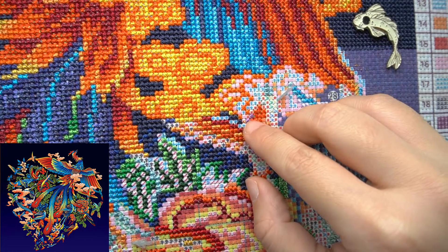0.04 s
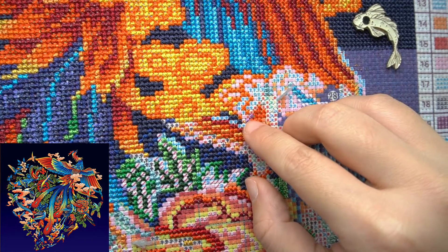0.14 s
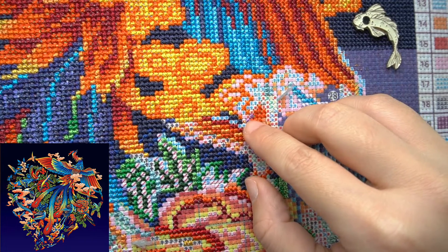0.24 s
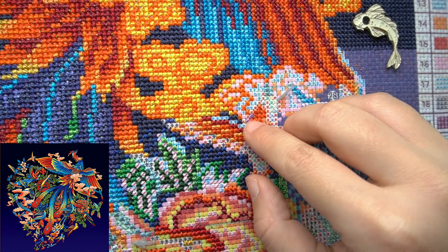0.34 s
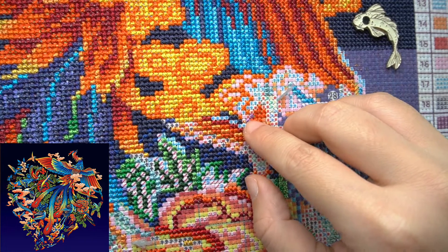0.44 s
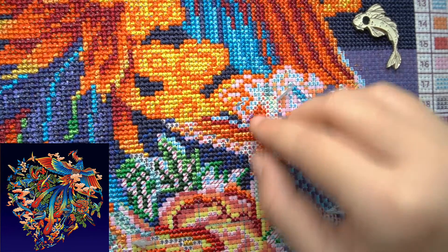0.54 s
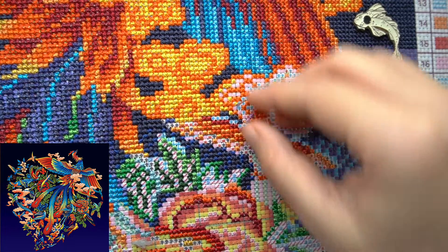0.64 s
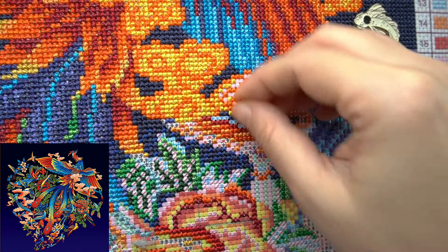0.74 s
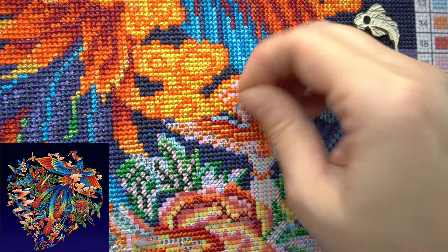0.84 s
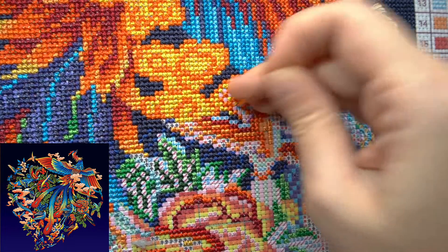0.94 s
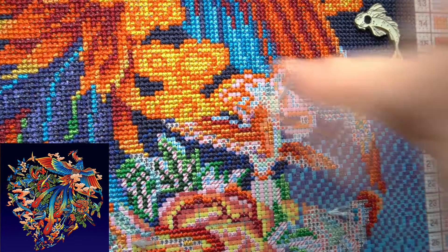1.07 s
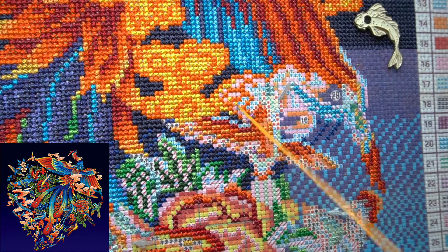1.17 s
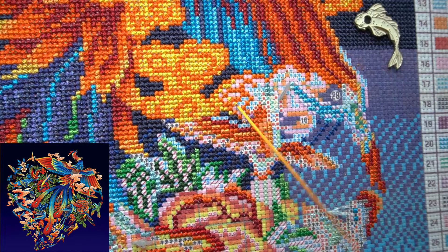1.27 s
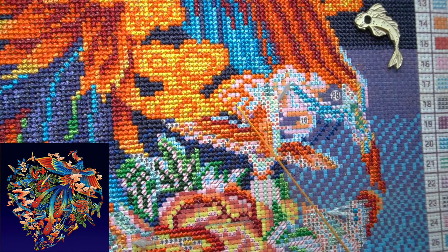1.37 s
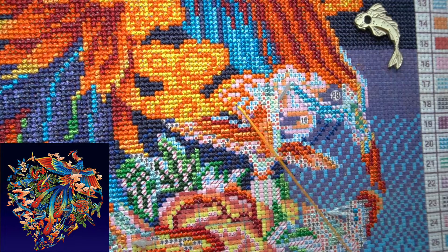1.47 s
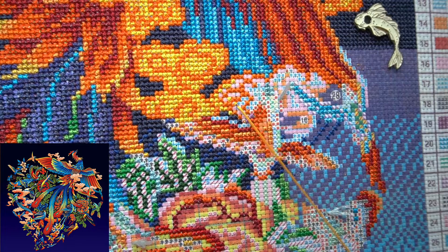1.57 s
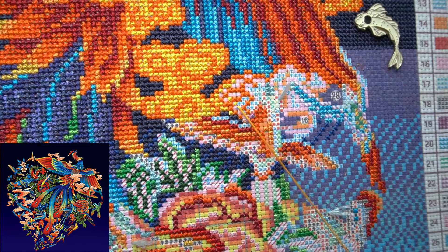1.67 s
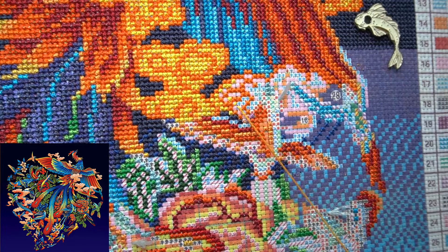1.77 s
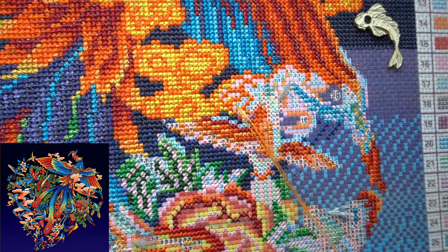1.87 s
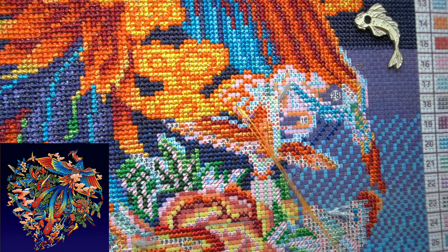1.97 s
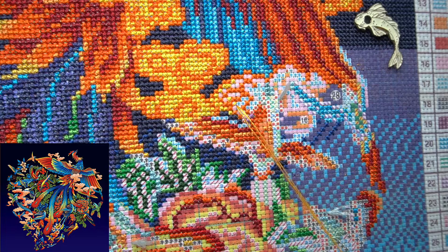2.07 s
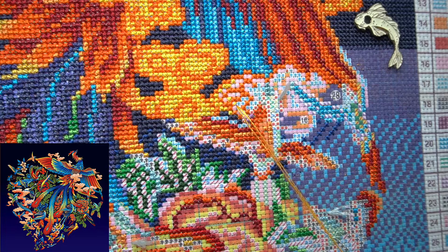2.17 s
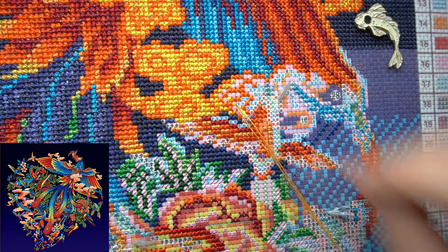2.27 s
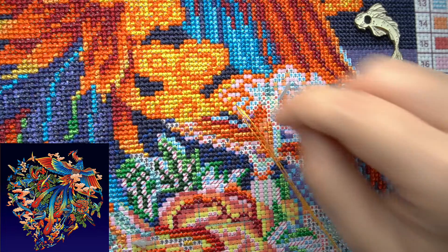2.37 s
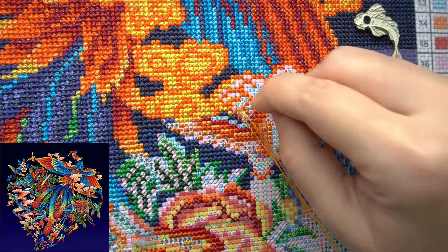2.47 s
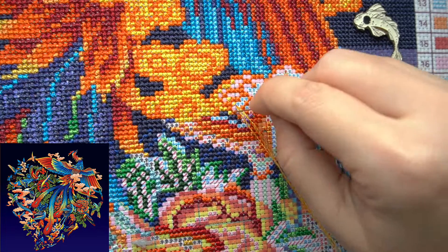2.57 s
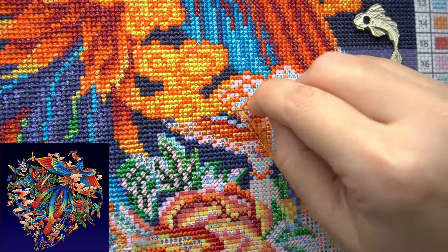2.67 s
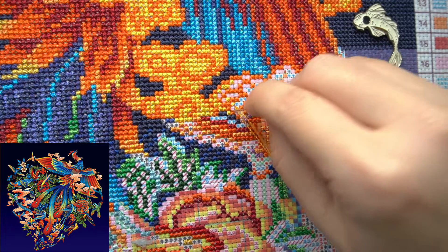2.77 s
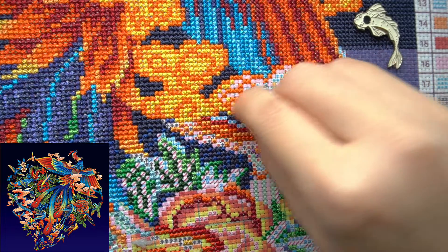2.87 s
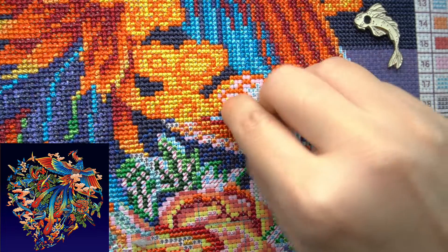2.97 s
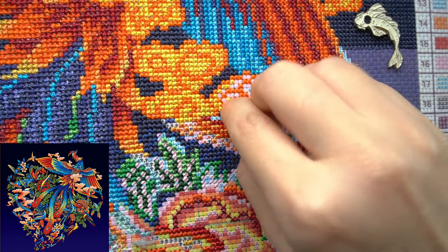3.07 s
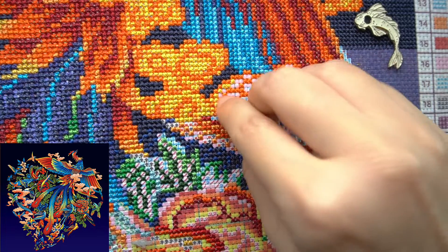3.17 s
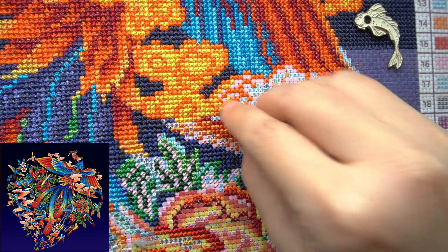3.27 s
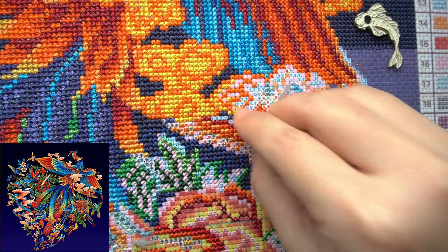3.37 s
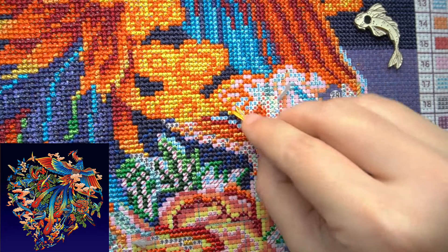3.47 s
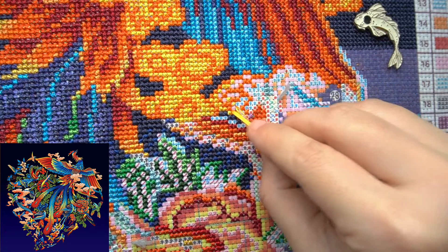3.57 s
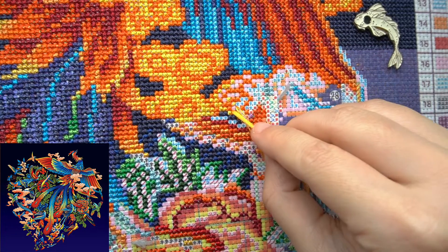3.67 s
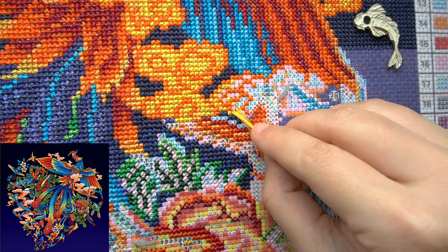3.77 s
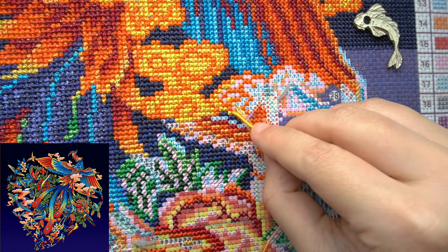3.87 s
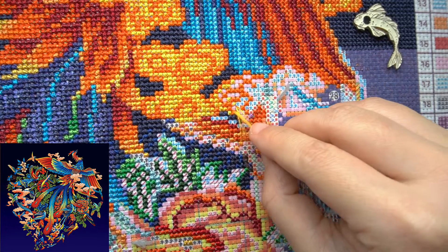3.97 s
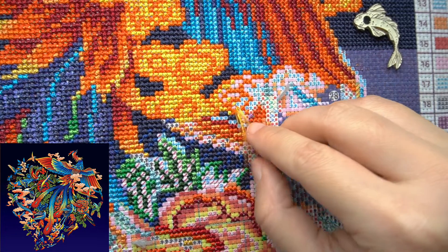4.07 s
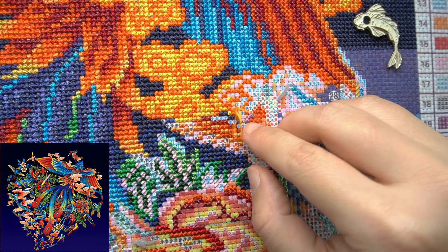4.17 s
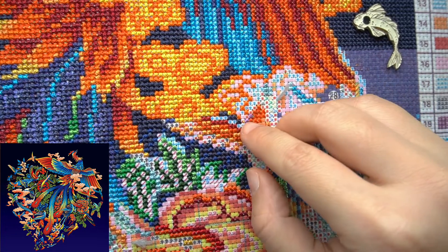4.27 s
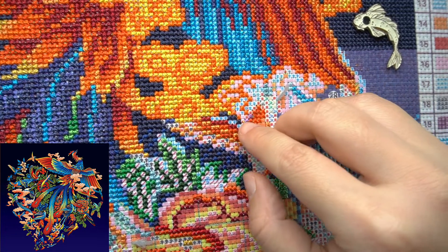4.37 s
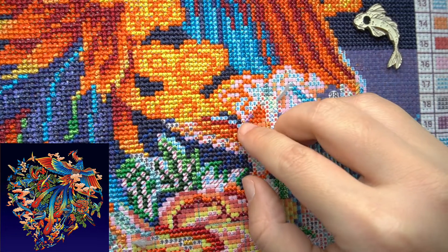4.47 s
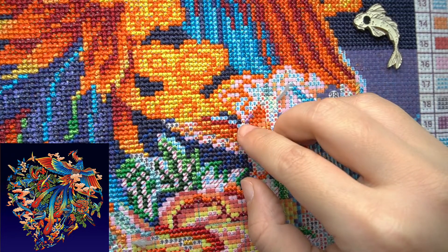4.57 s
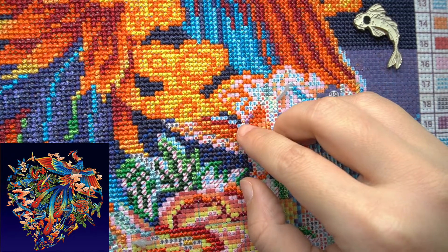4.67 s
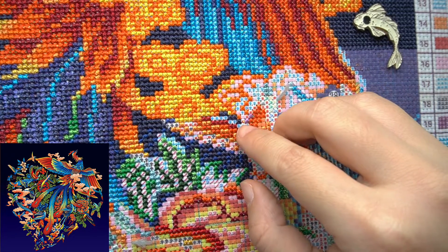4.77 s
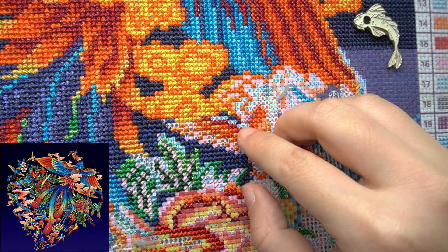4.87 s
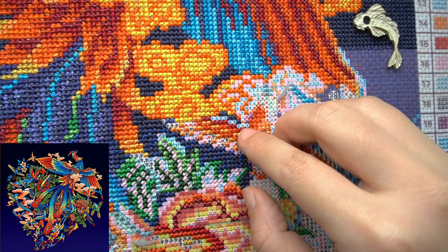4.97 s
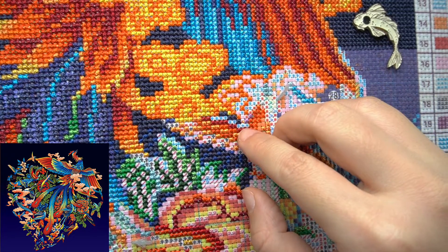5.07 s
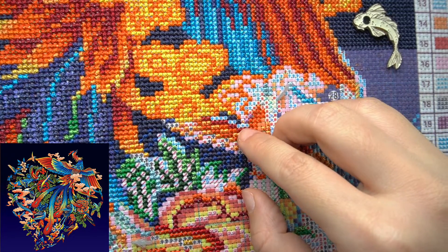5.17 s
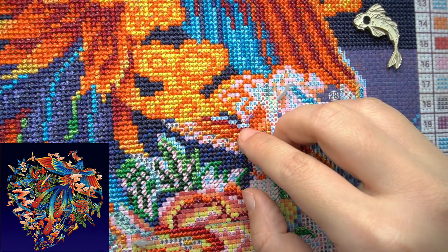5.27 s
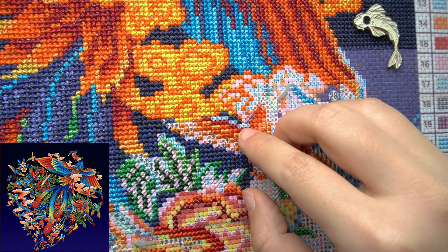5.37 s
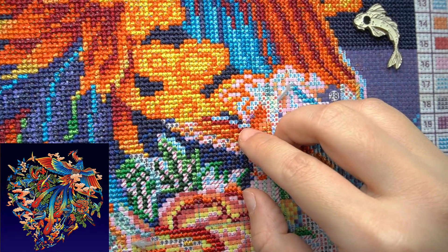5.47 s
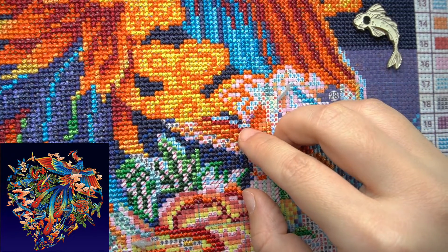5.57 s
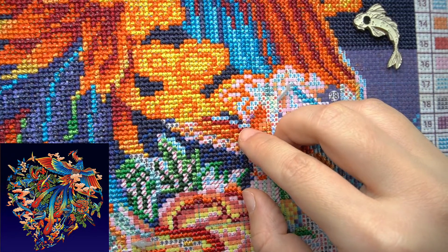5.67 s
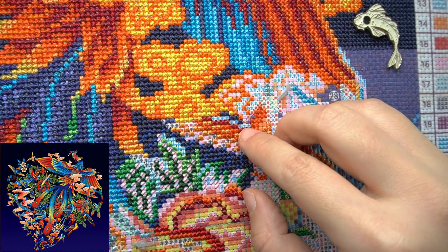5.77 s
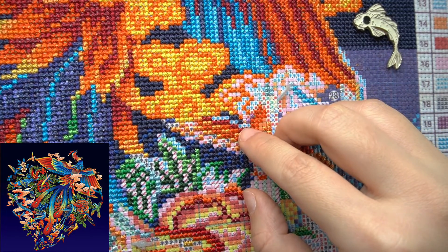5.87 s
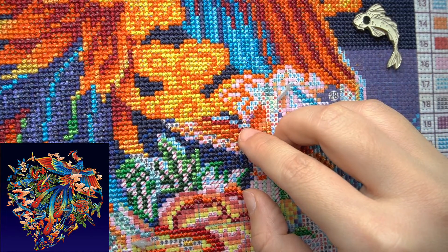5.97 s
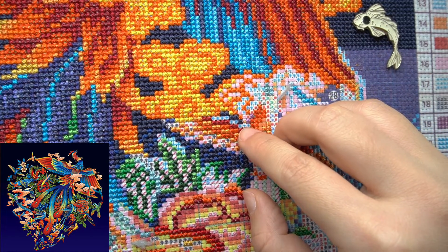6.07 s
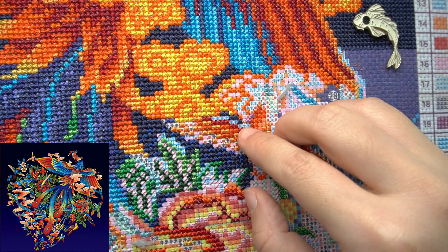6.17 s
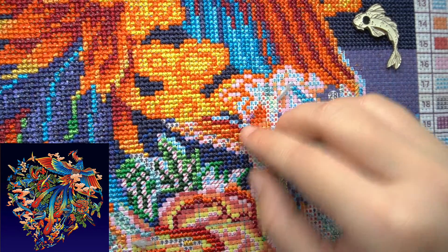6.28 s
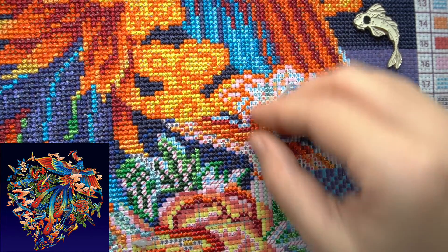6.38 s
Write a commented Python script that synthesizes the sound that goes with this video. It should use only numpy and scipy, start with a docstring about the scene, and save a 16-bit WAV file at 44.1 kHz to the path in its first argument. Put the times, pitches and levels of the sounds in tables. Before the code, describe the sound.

A needle works through a taut, drum-like cloth. Small fingertip rustles build to a loud snap, followed by a fibrous thread rasp that swells and fades within about half a second. Quiet hiss fills the gap. More light taps, a low knock, a gentle rasp and another crisp snap follow. The frame creaks faintly, and a last isolated pop sounds with no pull after it. Close, dry, slight room tail.

```python
"""A needle pops through stiff canvas stretched on a frame, at three holes; the first two times thread is drawn after.
The taut cloth is a sounding board: clicks (pops, taps) and dense grains (rasping fibres) ring the same resonances.
Strong pushes swell a deep resonance of the frame, friction noise squeaks, and wood creaks near the end.
A close pair of microphones hears this in a quiet room: decaying noise makes the short tail, banded noise the hiss."""
import sys
import numpy as np
from scipy import signal
from scipy.io import wavfile

SR = 44100
rng = np.random.default_rng(int(sys.argv[2]) if len(sys.argv) > 2 else 0)


def digitize_waveform(pressure):
    """Quantize a signal to 16-bit integers and store it at the path in sys.argv[1].

    Rows of a 2-D input are taken as channels; values are limited to [-1, 1].
    """
    field = np.atleast_2d(pressure).T
    bounded = np.clip(field, -1, 1)
    quanta = np.round(bounded * 32767).astype(np.int16)
    wavfile.write(sys.argv[1], SR, quanta)


def volts_from_db(level):
    """Convert decibel levels to linear amplitude ratios."""
    exponent = np.asarray(level, float) / 20
    return 10 ** exponent


N = 283122

# resonances of the stretched canvas:
# (f/Hz, width/Hz, level at first hole/dB, at second hole/dB, at third hole/dB, left-right balance/dB)
CANVAS = [(238, 29, -32, -43, -40, -34), (315.8, 18.5, -2, 4.5, -26, 0.5), (345, 32, -2, 0, -17, 4.5),
          (412, 48.4, 0.5, 2, -2.5, -0.5), (589.3, 51, -4, -1.5, -11, 0), (707, 62, -1, -1.5, 3, -0.5),
          (793, 66.6, -1, -4.5, -1, -4), (850, 58.4, 1.5, -5, 7, 1), (972, 110, -12.5, -36, -4, -1),
          (1266, 122, -4, -2.5, 3.5, -3), (1395, 125, -5, -14.5, 0.5, -1.5), (1788, 187, -12.5, -14, 1, -2),
          (2020, 213, -9.5, -8.5, -14, -2.5), (2380, 246, -12.5, -16, -18, 0.5),
          (2836, 58, -16.5, -13.5, -39, -11.5), (3065, 39, -14, -13.5, -30, -1),
          (3630, 240, -13.5, -8.5, -14, 0), (4144, 218, -13.5, -9.5, -28, -1),
          (4650, 250, -17, -11, -11, 2), (5235, 200, -17, -17.5, -17, -3.5),
          (5990, 245, -22.5, -22, -14.5, 4), (7020, 106, -18, -15, -14.5, -3),
          (7400, 300, -20, -21.5, -14, 0), (8370, 870, -21, -18.5, -21, -0.5),
          (10200, 1200, -35, -36, -25, -3), (10430, 79, -26, -22, -27, -4),
          (11330, 850, -26, -23.5, -30, -1), (12200, 540, -29, -61, -43, -11),
          (12900, 390, -28, -24.5, -38, -12), (14700, 3400, -34, -30.5, -40, 2)]
# moments when the work moves on to the next hole: t/s
NEXT_HOLE_S = [2.3, 4.9]
EDGE_HZ = 195   # below this, air slips round the cloth and little is radiated
THUMP_HZ, THUMP_WIDTH_HZ = 101.5, 42   # the whole frame gives way
CLICK_DELAY_S = 0.00254   # each click of a pop or thump sounds this long after its listed time
WIDE_HZ = 1490   # left and right are spread apart mostly above this


def rms_one(x):
    """Scale to rms 1."""
    return x / np.sqrt(np.mean(x ** 2) + 1e-20)


def at_hz(points, hz):
    """Read a table on a log-frequency axis."""
    table_hz, values = np.transpose(points)
    return np.interp(np.log(hz), np.log(table_hz), values)


def drift(rate_hz):
    """Slow random wander of rms about 1: noise through two equal low-pass poles, at one fortieth of the rate."""
    r = np.exp(-80 * np.pi * rate_hz / SR)
    noise = rng.standard_normal(N // 40 + 2002)
    slow = signal.lfilter([1], [1, -2 * r, r * r], noise)[2000:]   # drop the filter's start-up
    return np.interp(np.arange(N) / 40, np.arange(len(slow)), rms_one(slow))


def ring(force, hz, width_hz):
    """A resonator: a unit click sets a sine of height 1 ringing and dying, faster for a larger width."""
    r, w = np.exp(-np.pi * width_hz / SR), 2 * np.pi * hz / SR
    return signal.lfilter([0, np.sin(w)], [1, -2 * r * np.cos(w), r * r], force + 1e-18)


def sides(db):
    """Left and right gains for a balance in dB."""
    return volts_from_db(np.array([[db / 2], [-db / 2]]))


def high_pass(x, hz, order):
    """Weaken what lies below hz."""
    return signal.sosfilt(signal.butter(order, hz, "high", fs=SR, output="sos"), x)


def held_db(start_s, held_s, level_db, rise_db_per_s, fall_db_per_s):
    """Level in time of a sound that rises, holds and falls away, down to a floor 100 dB below."""
    t = np.arange(N) / SR - start_s
    rise = rise_db_per_s * np.maximum(-t, 0)
    fall = fall_db_per_s * np.maximum(t - held_s, 0)
    return level_db - np.minimum(rise + fall, 100)


def hiss():
    """Air in the room and microphone noise: half-octave bands, each with its own level, likeness and balance."""
    # relative noise density: (f/Hz, level/dB per Hz)
    density = [(15, -43), (25, -32), (44, -12), (72, -12.5), (133, -3), (165, -14.5), (234, -2),
               (370, -3.5), (570, 1), (688, -1.5), (1150, -1), (1250, -2.5), (2020, -5), (15700, -19)]
    # correlation of left and right: (f/Hz, likeness from -1 to 1)
    likeness = [(60, 0.91), (180, 1), (550, -0.16), (1650, -0.055), (4970, -0.1), (15000, 0.4)]
    # stereo balance: (f/Hz, left-right/dB)
    balance = [(60, 0.5), (240, -0.5), (950, -1), (3770, -1.5), (15000, 0)]
    out, edges = 0, 25 * 2 ** np.arange(0, 9.6, .5)
    white = rng.standard_normal((2, 2, N))   # neighbouring bands take different noise
    for k, (low, high) in enumerate(zip(edges, edges[1:])):
        band = signal.butter(2, [low, high], "band", fs=SR, output="sos")
        mid, side = signal.sosfilt(band, white[k % 2])
        hz = np.sqrt(low * high)
        alike = np.clip(at_hz(likeness, hz), -1, 1)
        gain = volts_from_db(at_hz(density, hz)) * sides(at_hz(balance, hz))
        out = out + gain * (np.sqrt(1 + alike) * mid + np.sqrt(1 - alike) * side * [[1], [-1]])
    return volts_from_db(-66) * rms_one(out)   # overall level in dB


def pops(damping=1.47, accent_octaves=0.12, contact_hz=7000):
    """Each pop kicks all resonances, those near its own pitch more or less strongly; the hand damps them."""
    # needle pops and finger taps:
    # (t/s, level/dB, own f/Hz, accent near it/dB, brightness/dB per octave from the own f)
    pop_table = [(0.115, -60, 850, 12, 0), (0.202, -57, 700, 5, 0), (0.651, -45.5, 681, -1, -1.5),
                 (0.68, -43, 336, 21, 2), (0.7, -48, 339, 18, 0.5), (0.727, -47, 345, 8, 1),
                 (0.773, -51, 2300, 6, 1), (0.784, -52, 2300, 3, -2), (0.865, -40, 867, 16, 5),
                 (0.91, -35.5, 890, 32, -10), (0.971, -22, 921, 30, -9.5), (2.746, -51.5, 327, 11, -3),
                 (3.087, -56.5, 705, 12, 0), (3.324, -49, 1260, 4, 3), (3.475, -34, 326, 8, -2.5),
                 (4.034, -24, 2020, 0, 1), (4.036, -33, 291, -24, 7), (4.379, -61, 570, 26, 3),
                 (5.284, -56.5, 706, 17, -7), (5.388, -58, 339, 10, -16), (5.584, -21.5, 740, -7, -1),
                 (6.354, -50, 719, 17.5, 6.5)]
    # the table under the cloth echoes each pop, one row a hole: (delay/s, share kept)
    table_echo = [(0.0024, 0.041), (0.0017, 0.14), (.0029, 0.29)]
    s, level_db, own_hz, accent_db, bright = np.transpose(pop_table)
    at = ((s + CLICK_DELAY_S) * SR).astype(int)
    hole = np.searchsorted(NEXT_HOLE_S, s)
    modes = np.array(CANVAS)
    octaves = np.log2(modes[:, :1] / own_hz)
    accent = accent_db * np.exp(-(octaves / accent_octaves) ** 2)   # negative: that pitch is weakened
    hole_db = modes[:, 2:5][:, hole]
    kick = volts_from_db(hole_db + bright * octaves + accent) * modes[:, 1:2]   # wide resonances take more
    kick = -volts_from_db(level_db) * kick / np.sqrt(np.sum(kick ** 2, axis=0))
    delay_s, share = np.array(table_echo)[hole].T
    lag = (delay_s * SR).astype(int)
    out = 0
    for (hz, width_hz, *_, pan_db), strengths in zip(CANVAS, kick):
        clicks = np.zeros(N)
        for echo in range(3):   # the pop itself, then two echoes
            np.add.at(clicks, at + echo * lag, share ** echo * strengths)
        out = out + sides(pan_db) * ring(clicks, hz, damping * width_hz)
    out = high_pass(out, EDGE_HZ, 4)
    return signal.lfilter(*signal.butter(2, contact_hz, fs=SR), out)   # cloth is a soft contact


def rubbing():
    """Level, brightness, slack and speed of all rubbing; where contacts overlap, the louder one sets the colour."""
    # the thread is drawn through, one list a stitch: (t/s, level/dB,
    # slack that frees the deepest resonances/dB, speed that wakes the highest ones/dB)
    pull_table = [
        [(0.985, -48.5, -12, 4), (1.05, -56, -12, -11), (1.11, -40, -1, -3.5), (1.214, -36, -2, -1.5),
         (1.3, -34, 1, 2), (1.42, -37, -13.5, 4), (1.503, -40.5, -15, 0.5), (1.515, -49, -9, 2),
         (1.71, -59.5, -6.5, 5), (1.97, -93, 0, 8)],
        [(3.49, -59, -4, 0), (3.57, -62, 7.5, -7), (3.62, -52, -2, -9), (3.706, -45.5, 2, -7),
         (3.77, -48.5, 2.5, -4), (3.905, -43.5, 0.5, 1.5), (3.965, -48, -11, 4), (4.074, -54.5, 0.5, -1),
         (4.332, -67, -11, 0), (4.44, -77, -4, 5)],
    ]
    # needle shaft and fingertips scuff the cloth:
    # (start t/s, held/s, level/dB, brightness/dB per octave, slack/dB)
    scuff_table = [(0.16, 0.005, -71, -3, -11), (0.2, 0.096, -72, -3, -5), (0.555, 0.06, -66.5, 3, 2),
                   (0.62, 0.027, -58.5, 2, 5), (0.653, 0.058, -55.5, 0.5, 2), (0.727, 0.054, -57, 1, 3.5),
                   (0.776, 0.013, -53, 1, -4), (0.808, 0.046, -61, 1.5, 7), (0.866, 0.0057, -48.5, -1, -3),
                   (0.885, 0.02, -53, 2, 1), (0.908, 0.018, -41.5, 0.5, 0), (0.927, 0.018, -41, 0.5, 5),
                   (2.866, 0.043, -69.5, -3, -3), (3.09, 0.005, -68, -5, -6), (3.149, 0.012, -65.5, 2.5, 5),
                   (3.197, 0.028, -68, 2, -4), (3.26, 0.051, -72, 2, 2), (3.322, 0.014, -60, 1.5, -5),
                   (3.341, 0.027, -51.5, -0.5, 4), (3.39, 0.07, -70, 0, 0), (4.37, 0.022, -64.5, -4, -8),
                   (5.282, 0.08, -77, 5.5, -3), (5.394, 0.0042, -70, 6, 4), (6.248, 0.06, -76, 0, -10),
                   (6.355, 0.0081, -64.5, 7, 5), (6.375, 0.028, -68, 3, 5), (6.406, 0.02, -56, 1, 12)]
    pull_fade_db_per_s = 2000
    scuff_rise_db_per_s, scuff_fall_db_per_s, scuff_speed_db = 2500, 1200, -3.5
    t, contacts = np.arange(N) / SR, []
    for pull in pull_table:
        s, level_db, slack_db, speed_db = np.transpose(pull)
        fade_db = held_db(s[0], s[-1] - s[0], 0, pull_fade_db_per_s, pull_fade_db_per_s)
        pull_db = np.interp(t, s, level_db) + fade_db
        contacts.append((pull_db, 0, np.interp(t, s, slack_db), np.interp(t, s, speed_db)))
    for start_s, held_s, level_db, bright, slack_db in scuff_table:
        scuff_db = held_db(start_s, held_s, level_db, scuff_rise_db_per_s, scuff_fall_db_per_s)
        contacts.append((scuff_db, bright, slack_db, scuff_speed_db))
    powers = [volts_from_db(2 * contact[0]) for contact in contacts]
    total = sum(powers)
    colours = [sum(p * contact[k] for p, contact in zip(powers, contacts)) / total for k in (1, 2, 3)]
    return [10 * np.log10(total)] + colours


def fibre_slips(level_db, most_per_s=4000, denser=0.4, thinnest=0.27, spread_db=1.5):
    """Random grains of either sign as fibres catch and slip on the weave; a light touch catches fewer."""
    density = np.clip(volts_from_db(denser * (level_db - level_db.max())), thinnest, 1)
    odds = most_per_s / SR * density
    slips = (rng.random((2, N)) < odds) / np.sqrt(odds)   # rarer grains are larger: even power
    sizes = volts_from_db(spread_db * np.minimum(rng.exponential(1, (2, N)), 4))
    mid, side = slips * sizes * rng.choice([-1, 1], (2, N))
    return rms_one(mid), rms_one(side)


def rasp(flutter_db=1.4, patchy_db=1.52, apart_db=-13, frame_db=-30, slack_hz=500, speed_hz=5600):
    """The dense grains of rubbed fibres drive every resonance of the cloth and shake the frame a little."""
    level_db, bright, slack_db, speed_db = rubbing()
    hole = np.searchsorted(NEXT_HOLE_S, np.arange(N) / SR)
    mid, side = fibre_slips(level_db)
    side = high_pass(side, WIDE_HZ, 1)
    force = volts_from_db(level_db + flutter_db * drift(34)) * (mid + volts_from_db(apart_db) * side * [[1], [-1]])
    out, power = 0, 0
    for k, (hz, width_hz, *hole_db, pan_db) in enumerate(CANVAS):
        tilt_db = bright * np.log2(hz / 1000) + slack_db * (hz < slack_hz) + speed_db * (hz > speed_hz)
        gain = volts_from_db(np.array(hole_db)[hole] + tilt_db) * width_hz
        wander = volts_from_db(patchy_db * drift(5.4))   # the thread's twist favours now one resonance, now another
        polarity = (-1) ** k
        out = out + polarity * sides(pan_db) * gain * ring(force * wander, hz, width_hz)
        power = power + gain ** 2 * SR / (4 * np.pi * width_hz)
    cloth = high_pass(out / np.sqrt(power), EDGE_HZ, 4)   # colour shifts leave the level nearly alone
    shaken = ring(force.mean(axis=0) * volts_from_db(slack_db), THUMP_HZ, THUMP_WIDTH_HZ)
    shaken = shaken * np.sqrt(4 * np.pi * THUMP_WIDTH_HZ / SR)   # as strong as the force
    return cloth + volts_from_db(frame_db) * high_pass(shaken, THUMP_HZ / 2, 2)


def squeaks(width_hz=150):
    """A fingertip skids on the thread: brief friction noise held to one narrow resonance."""
    # (t/s, f/Hz, level/dB, half length/s)
    squeak_table = [(.51, 3850, -79, .025), (0.59, 3740, -72, 0.038), (3.218, 1900, -67.5, 0.019)]
    t, noise = np.arange(N) / SR, rng.standard_normal(N)
    out = 0
    for s, hz, level_db, half_s in squeak_table:
        swell = np.exp(-((t - s) / half_s) ** 2)
        tone = rms_one(ring(ring(noise, hz, width_hz), hz, width_hz))
        out = out + volts_from_db(level_db) * swell * tone
    return out


def thumps():
    """The frame's deep resonance swells, then dies: a click through two equal resonators."""
    # pushes strong enough to move the whole frame: (t/s, strength/dB)
    push_table = [(0.68, -60), (0.865, -58), (0.91, -55), (0.969, -32.5), (2.745, -63), (3.087, -62.5),
                  (3.326, -53), (3.475, -48), (4.036, -56), (5.585, -56)]
    s, strength_db = np.transpose(push_table)
    clicks = np.zeros(N)
    clicks[((s + CLICK_DELAY_S) * SR).astype(int)] = -volts_from_db(strength_db)
    swelling = ring(ring(clicks, THUMP_HZ, THUMP_WIDTH_HZ), THUMP_HZ, THUMP_WIDTH_HZ)
    return swelling * 2 * np.pi * THUMP_WIDTH_HZ / SR


def creak(jerks_per_s=400, pan_db=3.0, rise_db_per_s=2500, fall_db_per_s=1800):
    """Wood slips on wood in small jerks that ring two low resonances of the frame."""
    # the frame creaks: (start t/s, held/s, level/dB)
    creak_table = [(4.657, 0.045, -60.5), (4.715, 0.0054, -58), (4.775, 0.0015, -54)]
    # resonances of the frame: (f/Hz, width/Hz, level/dB)
    frame_modes = [(459, 30, -13), (612, 42, -3.5)]
    level = sum(volts_from_db(held_db(*row, rise_db_per_s, fall_db_per_s)) for row in creak_table)
    jerks = (rng.random(N) < jerks_per_s / SR) * rng.uniform(0.36, 1, N)
    rung = 0
    for hz, width_hz, db in frame_modes:
        rung = rung + volts_from_db(db) * ring(ring(jerks, hz, width_hz), hz, 2 * width_hz)
    return sides(pan_db) * level * rms_one(rung)


def room_tail(work, build_s=0.0037):
    """Diffuse reflections: two answers of dying noise, each octave with its own decay."""
    # (octave centre f/Hz, decay by 60 dB/s, level/dB)
    octave_table = [(296, 0.35, -2), (700, 0.22, -2), (1540, 0.52, -9), (2850, 0.45, -3.5),
                    (6500, 0.69, -4)]
    t, answers = np.arange(SR // 2) / SR, 0
    for hz, t60, level_db in octave_table:
        octave = signal.butter(1, [hz / 2 ** .5, hz * 2 ** .5], "band", fs=SR, output="sos")
        band = signal.sosfilt(octave, rng.standard_normal((2, len(t))))
        dying = band * volts_from_db(-60 * t / t60) * (1 - np.exp(-t / build_s))
        answers = answers + volts_from_db(level_db) * dying * np.sqrt(hz / SR / np.sum(dying ** 2))
    source = work.mean(axis=0)
    shared, apart = signal.fftconvolve(source[None], answers, axes=1)[:, :N]
    wide = high_pass(apart, WIDE_HZ, 1)   # close microphones hear the tail differ only in the treble
    return shared + 0.8 * wide * [[1], [-1]]


def scene():
    """Cloth and frame sounds, their room tail and the hiss."""
    work = pops() + rasp() + squeaks() + thumps() + creak()
    return work + room_tail(work) + hiss()


def band_limit(x):
    """A steep low-pass at the top of the band."""
    return signal.sosfilt(signal.butter(12, 16420, fs=SR, output="sos"), x)


def record(dry):
    """A steep low-pass cuts the top of the finished mix."""
    steep = signal.ellip(10, .3, 70, 15750, fs=SR, output="sos")   # ripple dB, stop-band dB, edge Hz
    mix = signal.sosfilt(steep, dry)
    return band_limit(mix)


dry = scene()
out = record(dry)
digitize_waveform(out)
```